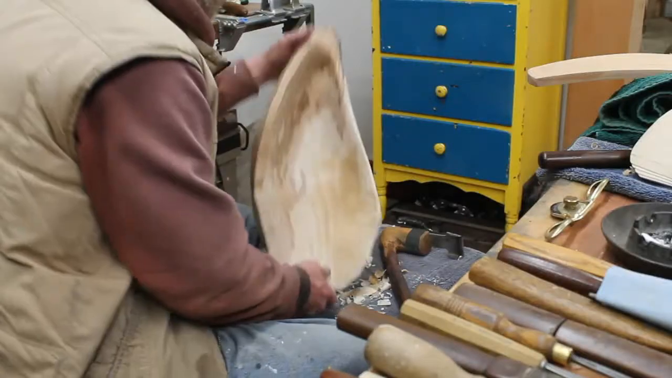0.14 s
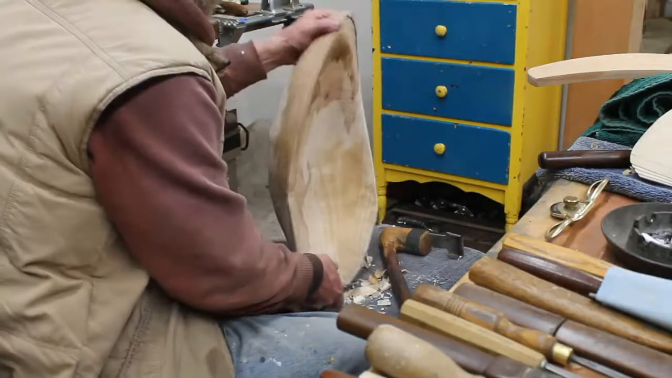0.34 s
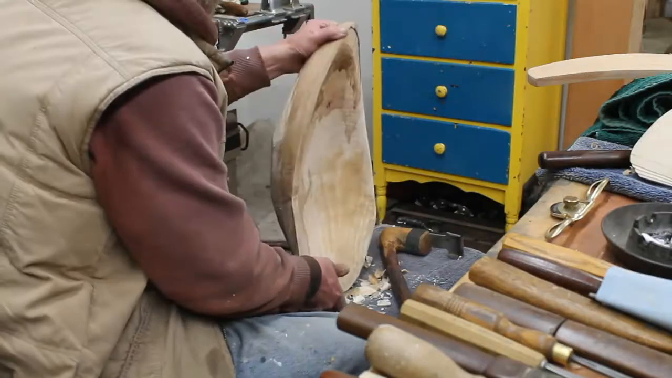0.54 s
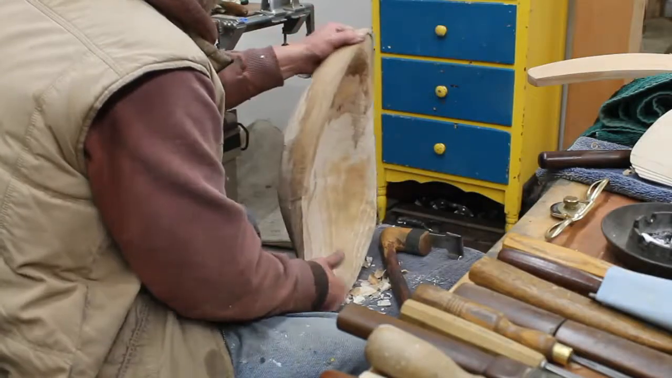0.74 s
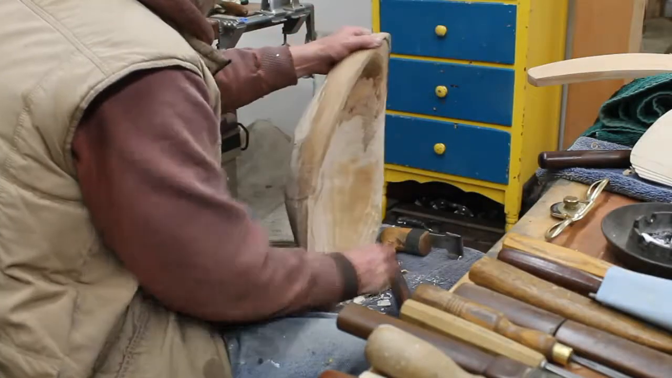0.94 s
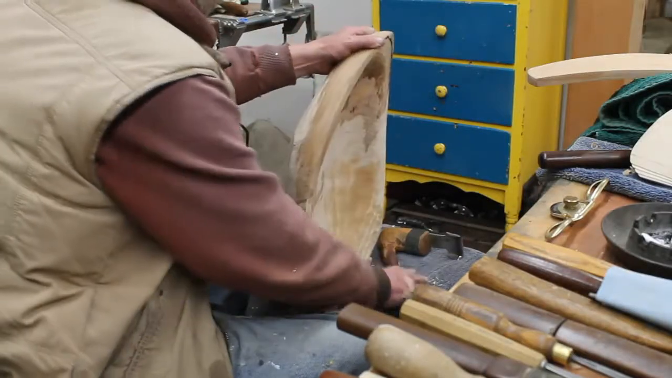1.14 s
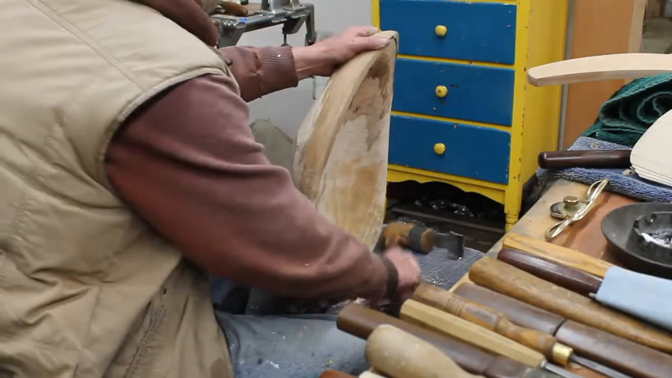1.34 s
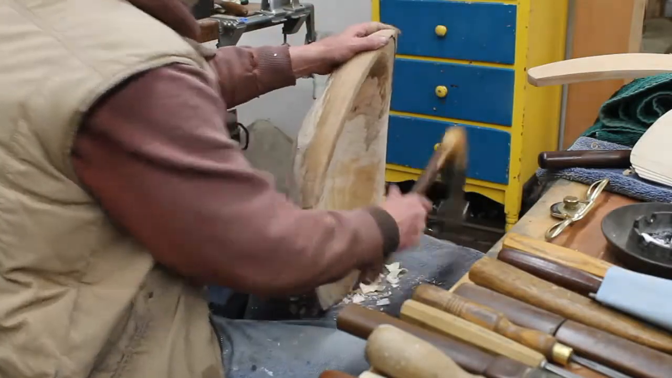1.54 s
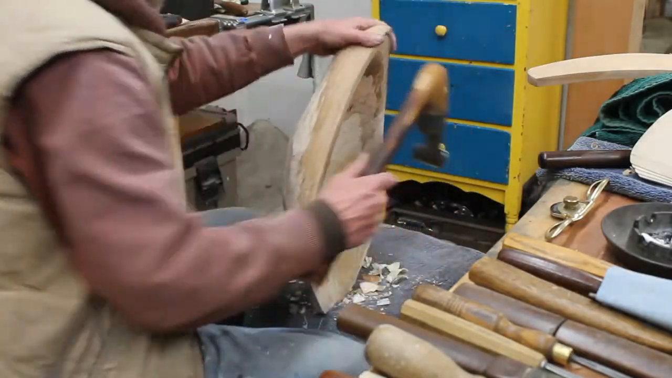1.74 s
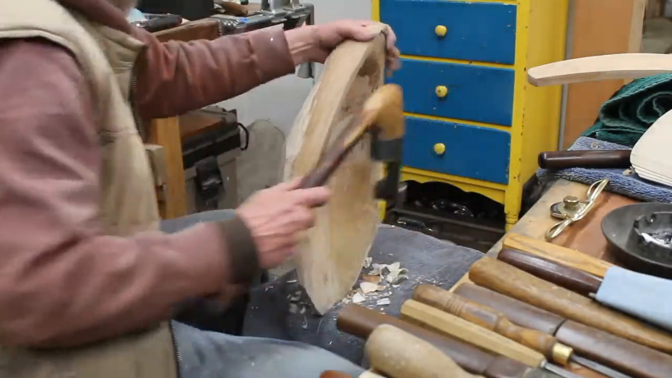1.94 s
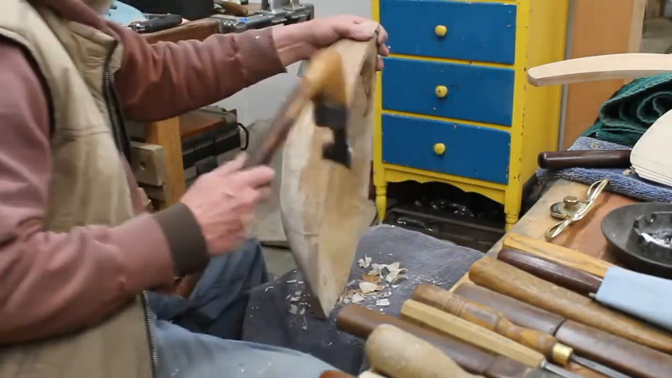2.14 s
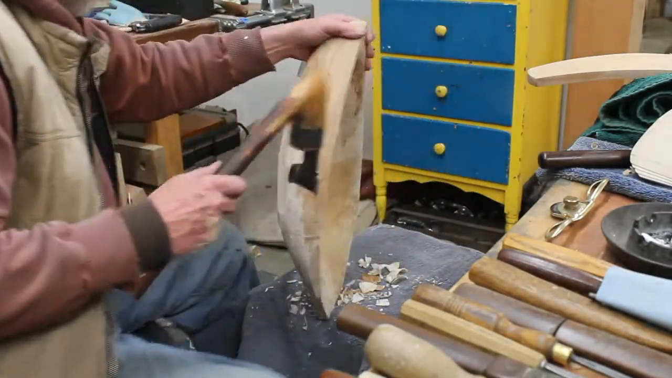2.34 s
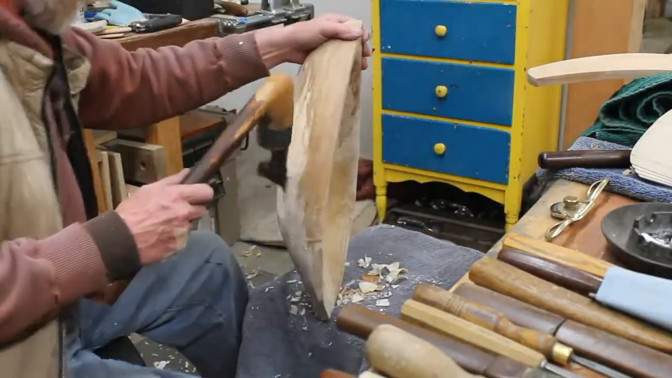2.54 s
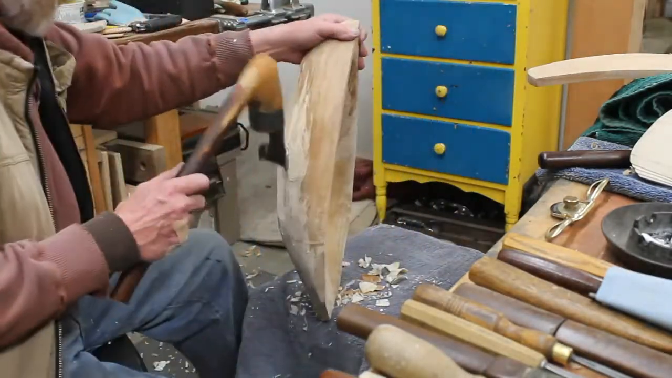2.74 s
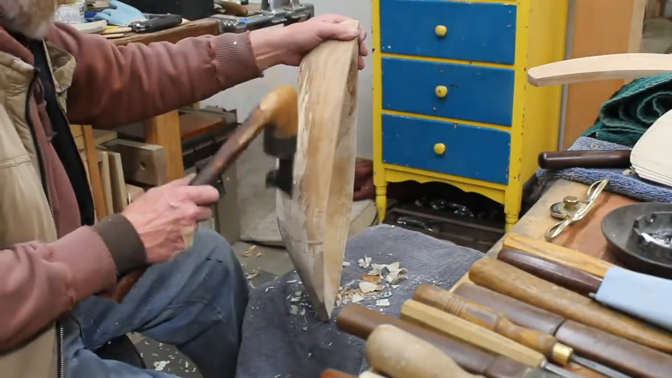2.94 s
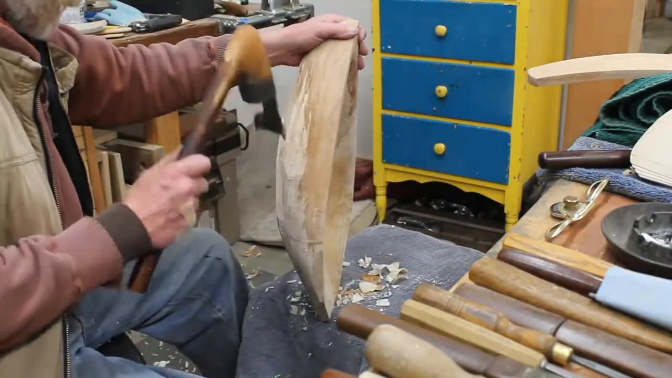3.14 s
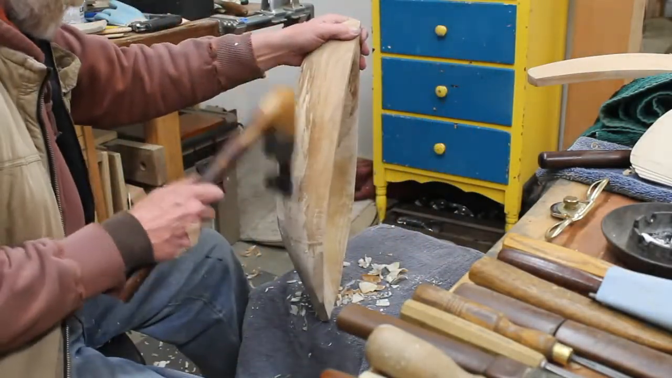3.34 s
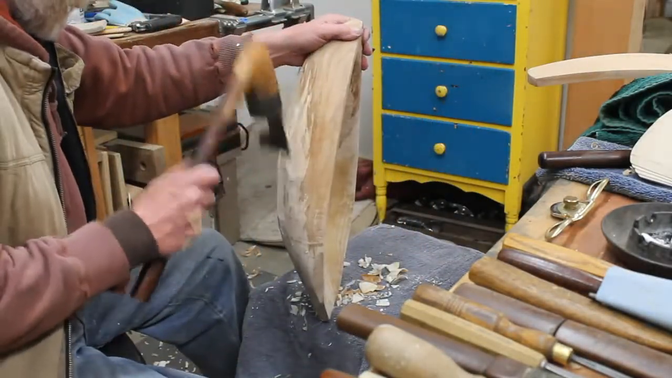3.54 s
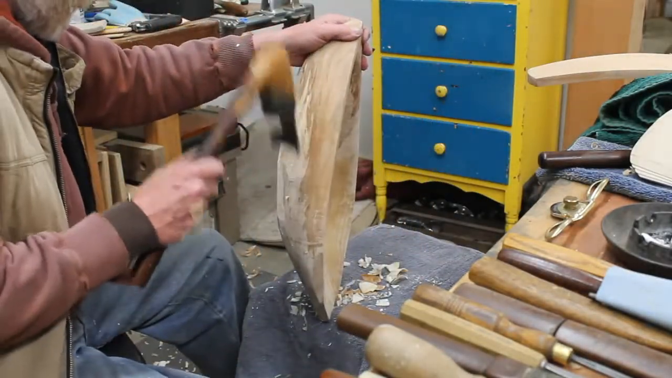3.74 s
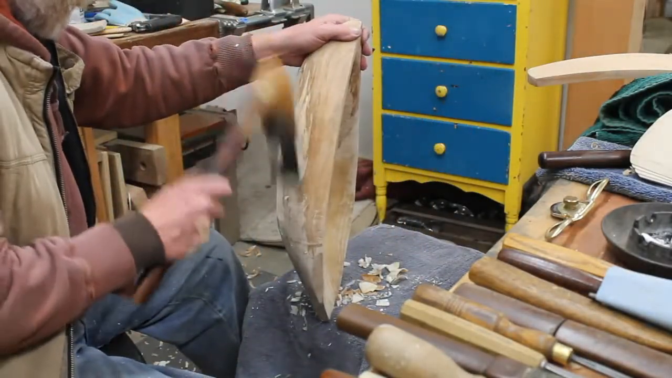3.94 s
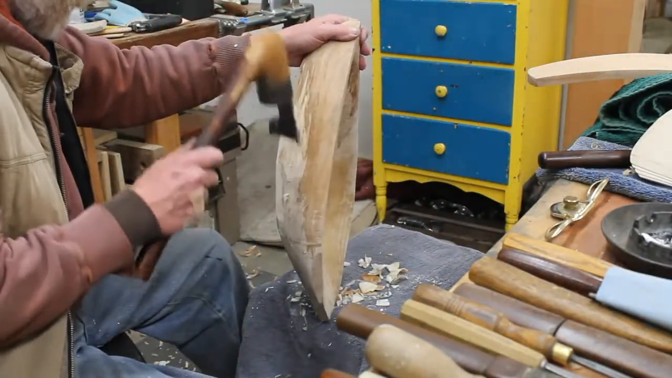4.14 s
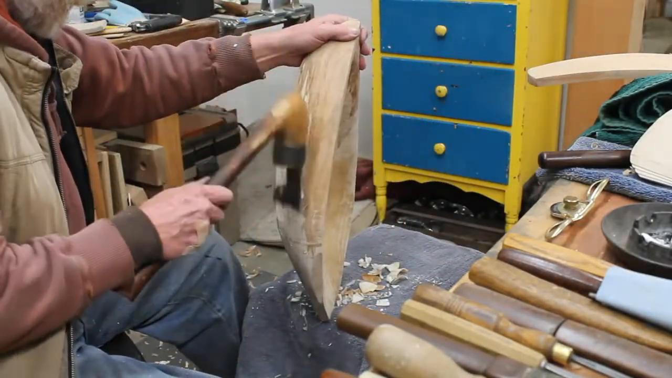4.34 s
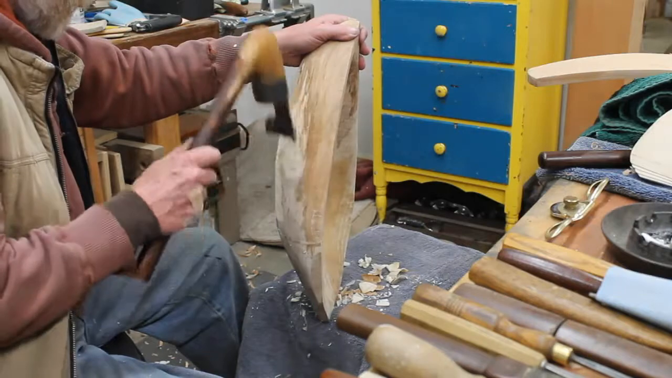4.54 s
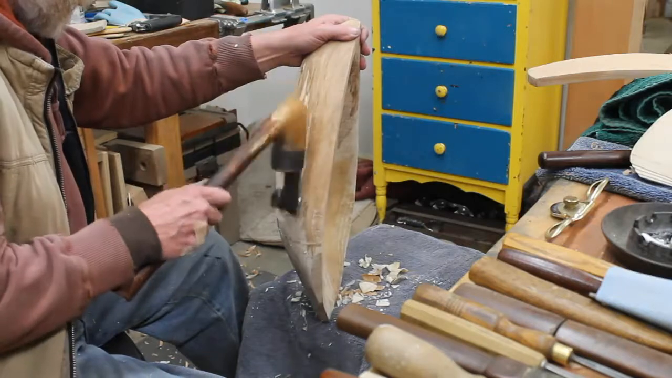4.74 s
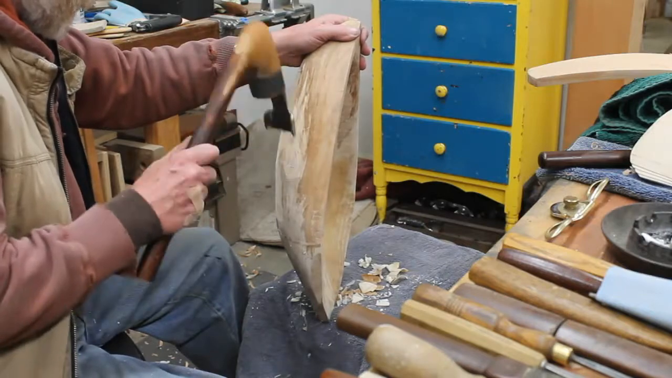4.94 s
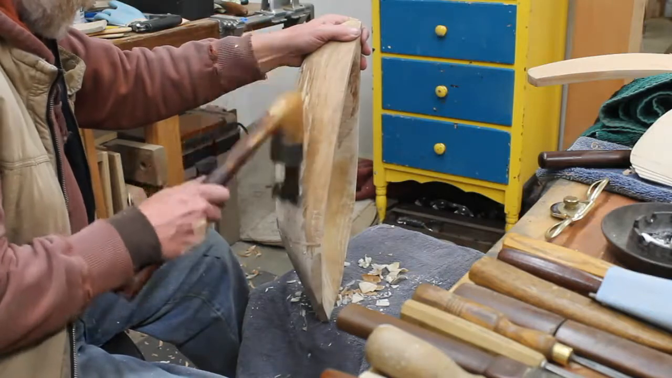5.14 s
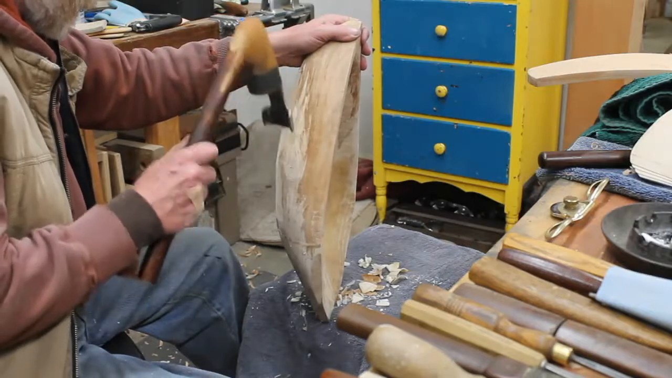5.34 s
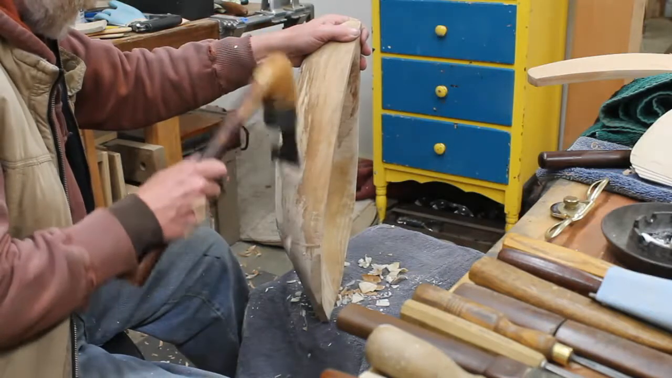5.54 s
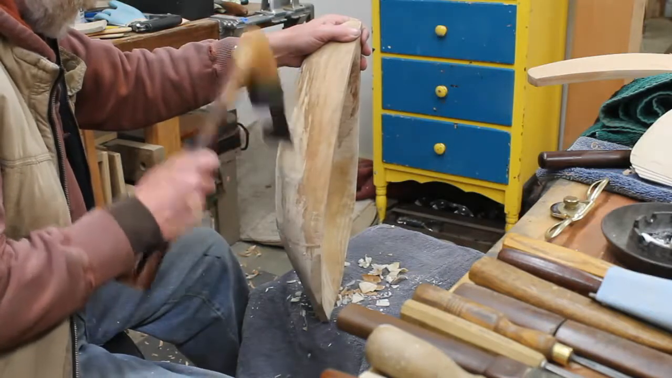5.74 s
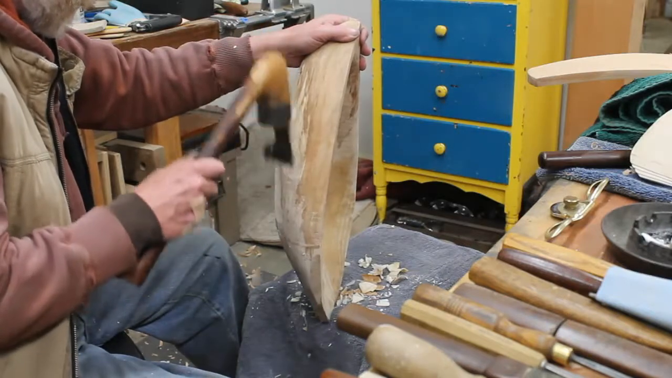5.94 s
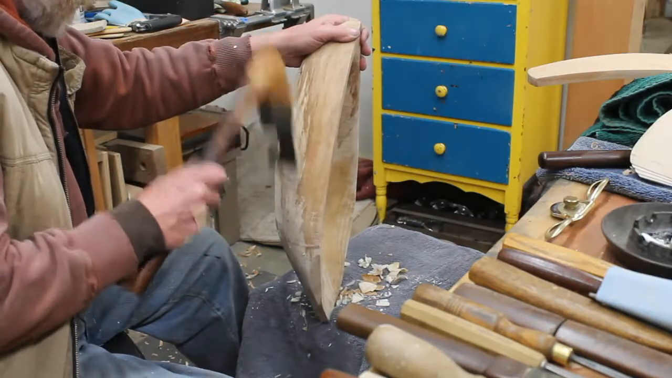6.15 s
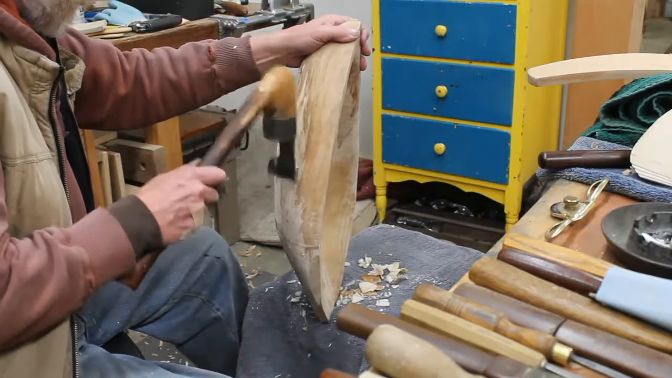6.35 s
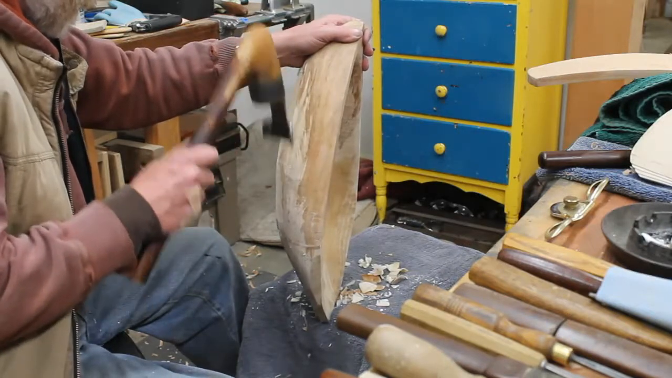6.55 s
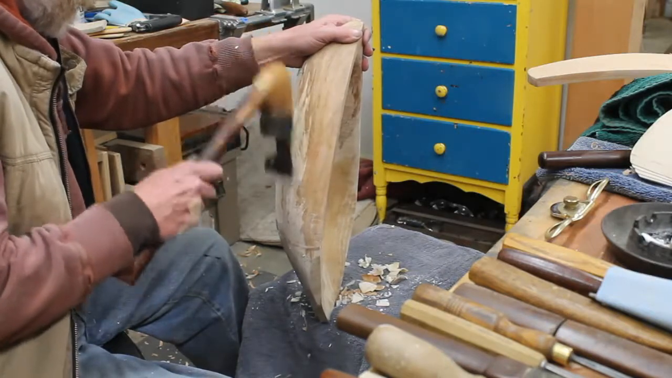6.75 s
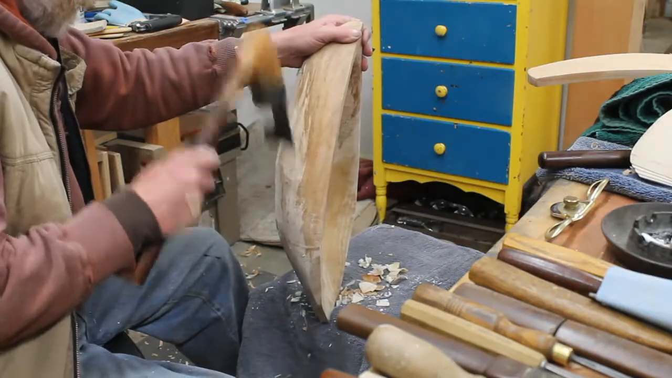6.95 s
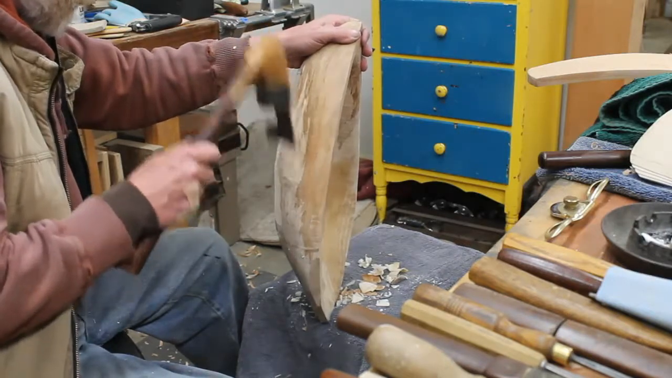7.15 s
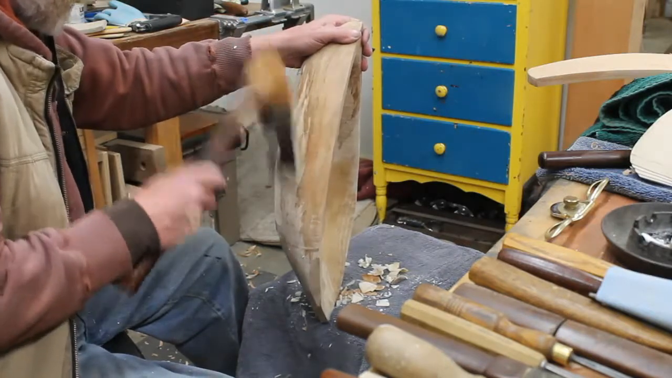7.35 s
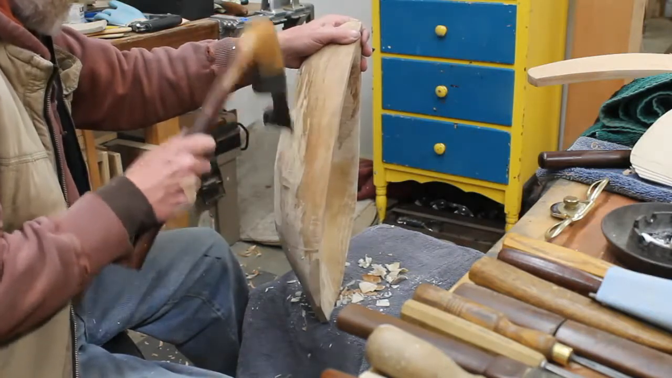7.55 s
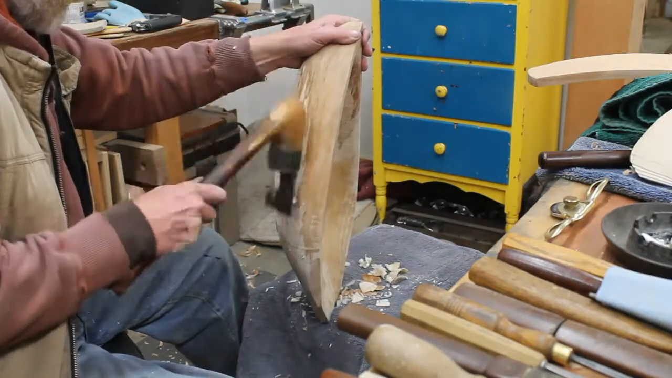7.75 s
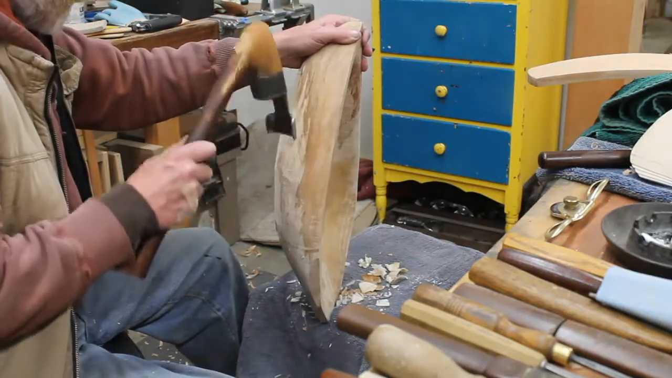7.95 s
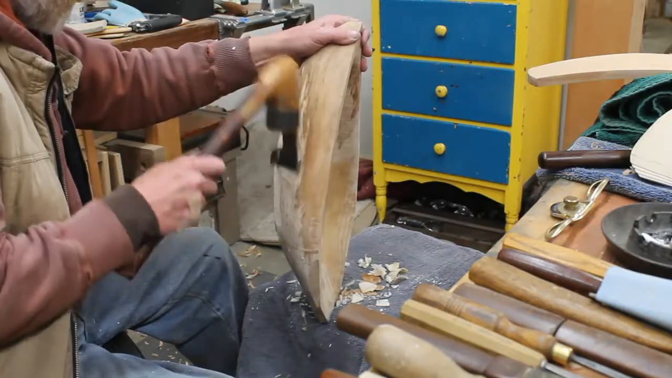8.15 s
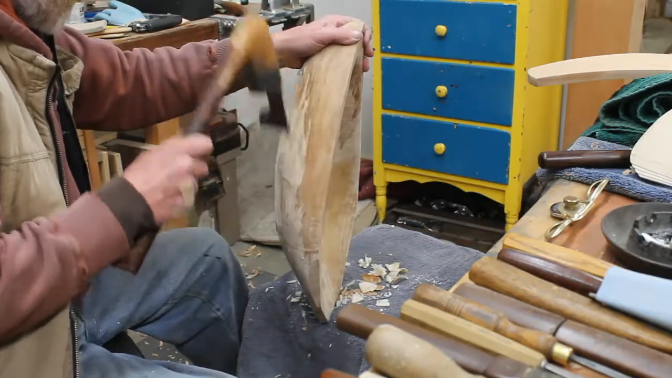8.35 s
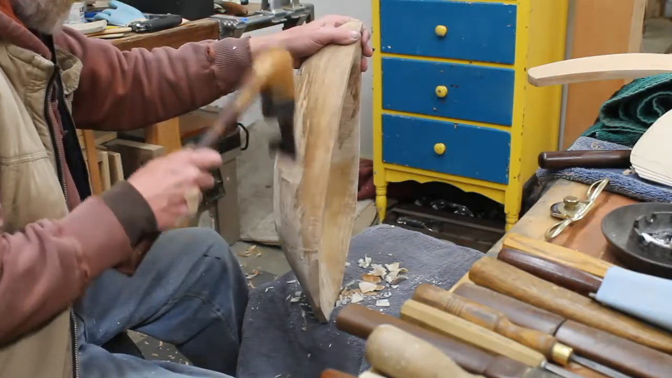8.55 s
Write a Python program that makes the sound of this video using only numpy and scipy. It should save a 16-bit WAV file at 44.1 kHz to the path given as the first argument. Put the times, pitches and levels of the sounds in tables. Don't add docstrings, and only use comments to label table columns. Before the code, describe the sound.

Jacket rustling and woody knocks as a bowl blank is shifted, then steady hatchet chops into green wood in a small workshop.

```python
import sys
import numpy as np
from scipy import signal
from scipy.fft import rfft, irfft
from scipy.io import wavfile
from scipy.ndimage import uniform_filter1d

SR = 44100
rng = np.random.default_rng(int(sys.argv[2]) if len(sys.argv) > 2 else 0)


def rack_gain(trim_db):
    fader = np.asarray(trim_db, float)
    return 10 ** (fader / 20)


def wav_record(signal):
    frames = np.transpose(np.atleast_2d(signal))
    bounded = np.clip(frames, -1, 1)
    quanta = np.round(bounded * 32767).astype(np.int16)
    wavfile.write(sys.argv[1], SR, quanta)


N = 379701

# [t/s, bite level/dB, bowl cavity level/dB, bowl wall level/dB, pitch of the struck spot f/Hz]
BLOWS = [(3.3451, -43, -35.5, -54, 1190), (3.674, -26.5, -34.5, -42, 1255), (4.023, -34, -47, -42, 1300),
         (4.029, -30, -35.5, -41.5, 1980), (4.366, -30.5, -37.5, -45, 1286),
         (4.7283, -34.5, -35.5, -51, 1390), (4.7523, -39, -37, -52.5, 1150), (5.108, -32, -34, -45.5, 1390),
         (5.476, -22, -28, -35, 1273), (5.8366, -23.5, -26, -29.5, 1340), (6.2052, -30, -30.5, -42, 1280),
         (6.2111, -18, -27.5, -28.5, 1240), (6.6556, -20, -27, -28.5, 1252), (7.0327, -28, -27, -31, 1346),
         (7.4084, -21, -32.5, -28, 1500), (7.7545, -25.5, -33, -45, 1280), (8.0817, -26, -46, -49, 1400),
         (8.086, -27, -25, -31, 1390), (8.4674, -23, -29, -36, 1360)]


def unit(x):
    return x / np.sqrt(np.mean(x ** 2))


def peak_one(x):
    return x / abs(x).max()


def band(x, lo_hz, hi_hz):
    limits = [lo_hz, min(hi_hz, 0.49 * SR)]
    return signal.sosfilt(signal.butter(2, limits, "band", fs=SR, output="sos"), x)


def colour(x, points):
    hz, db = np.transpose(points)
    f = np.arange(len(x) // 2 + 1) * SR / len(x) + 1
    return irfft(rfft(x) * rack_gain(np.interp(np.log(f), np.log(hz), db)), len(x))


def add(track, s, sound):
    i = int(s * SR)
    track[i:i + len(sound)] += sound[:N - i]


def burst(ms, rise_ms=0.21, shape=((20, 0), (20000, 0))):
    t_ms = np.arange(9600) * 1000 / SR
    noise = colour(rng.standard_normal(len(t_ms)), shape)
    return noise * (1 - np.exp(-t_ms / rise_ms)) * np.exp(-t_ms / max(ms, 0.2))


def walk(rate):
    k = int(SR / rate)
    steps = np.repeat(rng.standard_normal(N // k + 1), k)
    return unit(uniform_filter1d(steps, k)[:N])


def swells(s, db, swell_ms, fade_ms):
    coarse = np.arange(0, N, 64)
    late_ms = (coarse / SR - np.array(s)[:, None]) * 1000
    before_peak = -late_ms / np.reshape(swell_ms, (-1, 1))
    after_peak = late_ms / np.reshape(fade_ms, (-1, 1))
    fall_db = 10 * np.maximum(before_peak, after_peak)
    gain = np.sqrt((rack_gain(np.array(db)[:, None] - fall_db) ** 2).sum(axis=0))
    return np.interp(np.arange(N), coarse, gain)


def air():
    # [f/Hz, level/dB]
    air_tone = [(15, -57), (25, -26), (358, -4.5), (1280, -10), (1730, -10), (4130, -15), (15200, -23.5),
                (16500, -25)]
    hiss = unit(colour(rng.standard_normal(N), air_tone))
    return hiss * rack_gain(-62.5 + 1.3 * walk(2.832))


def rustle():
    # [peak t/s, scrape level/dB, cloth against wood level/dB, swell/ms, fade/ms]
    strokes = [(0.0, -58, 8, 100, 140), (.18, -54.5, 7.5, 190, 150), (.29, -57.5, -6, 160, 91),
               (.45, -51, -6.5, 90, 83), (.72, -54.5, 2.5, 75, 170), (.81, -53.5, -5, 47, 185),
               (1.08, -56.5, -2.5, 90, 330), (1.24, -61.5, 12, 180, 320), (1.36, -55.5, -1, 110, 88),
               (1.44, -61, -7.5, 85, 210), (1.55, -60, 2, 89, 130), (1.79, -50, 0.5, 107, 120),
               (1.87, -49, 0, 46, 170), (1.98, -49.5, -9.5, 100, 96), (2.15, -54, -10, 89, 82),
               (2.31, -48.5, -1, 80, 41), (2.46, -40.5, 4.5, 150, 340), (2.57, -45, 13.5, 65, 70),
               (2.639, -34, 10, 52, 62), (2.74, -45, -0.5, 130, 78), (3.109, -51, 2.5, 31, 88),
               (3.29, -61.5, -4, 80, 60)]
    # [peak t/s, level/dB, swell/ms, fade/ms]
    body_shifts = [
        (.3, -83, 330, 50),
        (.5, -80, 60, 340),
        (.93, -75, 100, 71),
        (1.35, -80, 250, 43),
        (1.52, -69, 72, 74),
        (1.75, -70.5, 46, 53),
        (2.0, -75.5, 150, 280),
        (2.5, -64.5, 30, 150),
        (3.23, -87, 120, 50),
    ]
    s, scrape_db, cloth_db, *shape_ms = np.transpose(strokes)
    rub_db = scrape_db - 5.5 - 0.65 * cloth_db
    nylon_db = scrape_db - 12 + 1.04 * cloth_db
    gains = [swells(s, scrape_db, *shape_ms),
             swells(s, rub_db, *shape_ms),
             swells(s, nylon_db, *shape_ms),
             swells(*np.transpose(body_shifts))]
    # [f/Hz, level/dB]
    tones = [[(600, -4), (1100, -0.5), (2500, -0.5), (4500, -3.5), (7000, -9.5), (10000, -15.5)],
             [(150, -14.0), (300, -9), (700, -7.5), (1100, -11.5), (1600, -11.5)],
             [(3500, -9), (6000, 1), (10000, -8.5), (15500, -11.0)],
             [(40, -20), (60, -1.5), (120, 8), (200, -17)]]
    grit_db = 2.5 * np.minimum(rng.exponential(size=N), 5)
    grains = rng.standard_normal((4, N)) * rack_gain(grit_db)
    out = np.zeros(N)
    for grain, tone, gain in zip(grains, tones, gains):
        flutter = rack_gain(1.3 * walk(70))
        out += unit(colour(grain, [(60, -113)] + tone + [(21000, -76)])) * gain * flutter
    return out


def sleeve():
    tone = [(20, -76), (500, 1.5), (1500, 5), (4000, 2.5), (9000, -13.5), (15500, -47), (21000, -60)]
    hiss = unit(colour(rng.standard_normal(N), tone))
    s, _, _, wall_db, _ = np.transpose(BLOWS)
    swing = swells(s - 0.01, -54 + 0.4 * wall_db, 50, 750)
    rest = rack_gain(-80)
    return hiss * (rest + swing) * rack_gain(1.4 * walk(12))


def taps():
    # [t/s, peak level/dB, colour f/Hz, length/ms]
    knocks = [(0.424, -45, 596, 2.8), (1.33, -51.5, 251, 4), (2.628, -30, 900, 8.3),
              (1.728, -40.5, 570, 14), (1.914, -34, 700, 2.9), (1.9615, -28.5, 783, 2.2),
              (2.123, -32, 660, 7.6), (2.258, -30, 710, 6.5), (2.3, -39, 730, 1.36), (4.672, -40, 564, 4.9),
              (6.166, -44, 560, 3)]
    # [t/s, peak level/dB, colour f/Hz, sharp edge relative level/dB]
    ticks = [(0.2488, -25.5, 2390, -9.5), (0.357, -37, 4640, -18), (1.8754, -33.5, 1990, 2.5),
             (1.9628, -32, 2800, -13), (1.9275, -32, 2050, -12), (2.1268, -24.5, 2050, -42),
             (2.2735, -29.5, 3180, 6.5), (2.439, -21, 3630, -1), (2.4602, -19, 2650, -20),
             (2.4722, -16.5, 4300, -7.5), (2.628, -24, 3500, -18), (2.645, -26, 4500, -28),
             (2.6981, -19.5, 3400, -20), (2.7107, -17.5, 4060, -33), (3.5496, -43.5, 1890, -4),
             (4.559, -45.5, 1670, -3), (6.491, -33.5, 3080, -16)]
    # [t/s, peak level/dB, colour f/Hz, length/ms, relative width 0-1]
    scratches = [(.248, -34.5, 4700, 1.6, 0.06), (.25, -37.5, 830, 4.5, 0.24),
                 (0.357, -38, 2200, 6.9, 0.76), (.435, -43.5, 750, 39, 0.17), (.815, -43.5, 1330, 27, 0.27),
                 (1.2, -60, 6260, 76, .03), (1.735, -41.5, 740, 120, 0.25), (1.75, -42.5, 2580, 89, 0.12),
                 (1.78, -55, 4670, 44, 0), (2.49, -33, 1440, 28, 0.15), (2.62, -26.5, 4040, 17, 0.12),
                 (3.566, -41.5, 1240, 12, 0.91), (4.674, -39.5, 1500, 14, 0.3),
                 (3.9018, -43.5, 2300, 2.5, 0.15), (4.68, -41, 2030, 14, 0.15),
                 (6.134, -37.5, 3220, 4.3, 0.23), (8.043, -44, 3500, 11, 0.7)]
    knock_width, knock_edge_db = 0.41, -12.5
    tick_ms, tick_width = 0.76, 0.32
    scratch_edge_db = -43
    hits = [(*row, knock_width, knock_edge_db) for row in knocks]
    hits += [(s, db, hz, tick_ms, tick_width, edge_db) for s, db, hz, edge_db in ticks]
    hits += [(*row, scratch_edge_db) for row in scratches]
    out = np.zeros(N)
    for s, db, hz, ms, width, edge_db in hits:
        hit = burst(ms, rise_ms=0.079 + 0.076 * ms)
        width = np.clip(width, 0.03, 0.8)
        wood = peak_one(band(hit, hz * (1 - width), hz * (1 + width)))
        edge = peak_one(band(hit, 2000, 10200))
        add(out, s, rack_gain(db) * (wood + rack_gain(edge_db) * edge))
    return out


def room(x):
    # [f/Hz, fade time/s]
    fade_times = [(100, 0.46), (350, 0.48), (1000, 0.53), (2500, 0.38), (6400, 0.35), (14000, 0.075)]
    wet_db, first_ms = -0.5, 0.44
    next_room_db, next_room_stretch = -26, 3.05
    hz, t60 = np.transpose(fade_times)
    t = np.arange(SR) / SR
    tail = np.zeros(len(t))
    for mid in 60 * 2 ** np.arange(0, 8.6, 0.5):
        noise = unit(band(rng.standard_normal(len(t)), mid / 2 ** 0.25, mid * 2 ** 0.25))
        fade_db = -60 * t / np.interp(np.log(mid), np.log(hz), t60)
        fade = rack_gain(fade_db) + rack_gain(next_room_db + fade_db / next_room_stretch)
        tail += np.sqrt(mid) * noise * fade
    tail *= 1 - np.exp(-(1000 * t / first_ms) ** 2)
    tail /= np.sqrt(np.sum(tail ** 2))
    return rack_gain(wet_db) * signal.fftconvolve(x, tail)[:N]


def thump():
    # [f/Hz, 60 dB fade time/s, build-up/s, signed share]
    floor_modes = [(62.6, 0.61, 0.034, 0.68), (55.3, 0.26, 0.028, -0.56), (103, 0.27, 0.008, 1),
                   (120.1, 0.25, 0.028, -1.98)]
    pair_db = (-8.5, -7.5)
    out, t = np.zeros(N), np.arange(SR) / SR
    for s, _, cavity_db, wall_db, _ in BLOWS:
        weight_db = 0.63 * wall_db + 0.65 * cavity_db
        for (hz, t60, rise, share), rel_db in zip(floor_modes, np.repeat(pair_db, 2)):
            swell = (1 - np.exp(-(t / rise) ** 2)) * rack_gain(weight_db + rel_db - 60 * t / t60)
            add(out, s - 0.003, share * swell * np.sin(2 * np.pi * hz * t))
    return out


def hatchet():
    # [f/Hz, level/dB]
    bite_tone = [(100, -50), (300, -38), (700, 4), (2100, -2.5), (2900, 3), (3800, -9), (6000, -8.5),
                 (12000, -39)]
    # [t/s, first mode f/Hz, first mode level/dB, upper modes level/dB]
    head_rings = [(3.344, 4390, -36.5, -64), (3.6741, 4640, -25.5, -42), (4.025, 4980, -26, -54),
                  (4.027, 4634, -25.5, -49), (4.366, 4730, -24, -48), (4.7292, 4560, -36, -59),
                  (4.753, 4350, -40.5, -54), (5.108, 4610, -27.5, -39), (5.4755, 4870, -20.5, -44),
                  (5.836, 4530, -27.5, -46), (6.2099, 5250, -16.5, -48), (6.657, 5300, -23, -50),
                  (7.033, 5080, -16.5, -41), (7.4097, 5340, -20.5, -40), (7.7547, 4970, -23, -43),
                  (8.085, 5000, -49, -45), (8.467, 4780, -20.5, -44)]
    # [f/Hz, level/dB, 60 dB fade time/s]
    upper_modes = [(8900, 2, .04), (6700, -10, .03), (12300, -10, .03)]
    bite_ms = 1.22
    free_hz, free_t60, grip_hz, split = 4350, 0.047, 650, 0.32
    out, t = np.zeros(N), np.arange(SR // 4) / SR
    for s, bite_db, *_ in BLOWS:
        crunch = peak_one(burst(bite_ms, shape=bite_tone))
        add(out, s, crunch * rack_gain(bite_db + 2.0))
    for s, hz, head_db, upper_db in head_rings:
        raised_hz = hz - free_hz
        t60 = free_t60 * np.exp(-raised_hz / grip_hz)
        pair = np.sin(2 * np.pi * hz * t) * np.cos(np.pi * split * raised_hz * t)
        ring = pair * rack_gain(head_db - 60 * t / t60)
        for upper_hz, rel_db, upper_t60 in upper_modes:
            ring += rack_gain(upper_db + rel_db - 60 * t / upper_t60) * np.sin(2 * np.pi * upper_hz * t)
        add(out, s, ring * (1 - np.exp(-t / 0.00092)))
    return out


def bowl():
    # [f/Hz, level/dB, 60 dB fade time/s]
    body_modes = [(159.6, -16.5, 0.15), (211, -14, 0.12), (281, -11.5, 0.13), (345, -4, 0.099),
                  (406.6, 2.5, 0.11), (463.7, 1, 0.084), (507, -9.5, 0.058), (518, -9, 0.13),
                  (656, -28.5, 0.21), (700, -25.5, 0.14), (774, -9.5, 0.085), (858, -4.5, 0.072),
                  (923, -3, 0.065), (1055, -4, 0.047)]
    # [f/Hz, level/dB, 60 dB fade time/s]
    wall_modes = [(1150, -21, 0.7), (1306, -16.5, 0.27), (1266.4, 4, 0.1), (1325, 6.5, 0.076),
                  (1455, 3, 0.041), (1500, -3.5, 0.2), (1563, -0.5, 0.058), (1943, 6.5, 0.033),
                  (2054, -10.5, 0.072), (2200, 1.5, 0.049), (2660, 5, 0.022)]
    spot_spread_db, pitch_spread = 2.0, 0.0074
    focus_peak_db, focus_octaves = 6.5, 0.087
    crush_db, crush_ms, crush_rise_ms = -4, 29, 15
    out, t = np.zeros(N), np.arange(SR // 4) / SR
    hz, db, t60 = np.transpose(body_modes + wall_modes)[:, :, None]
    hollow = (hz > 140) & (hz < 1100)
    onset = 1 - np.exp(-t * hz / 0.72)
    chance = rng.standard_normal((len(BLOWS), 3, len(hz), 1))
    for (s, _, cavity_db, wall_db, spot_hz), (spot, grip, phase) in zip(BLOWS, chance):
        focus_db = focus_peak_db * np.exp(-(np.log2(hz / spot_hz) / focus_octaves) ** 2)
        blow_db = np.where(hollow, cavity_db, wall_db + focus_db)
        size = rack_gain(db + blow_db + spot_spread_db * spot - 60 * t / t60)
        modes = size * np.sin(2 * np.pi * (hz * (1 + pitch_spread * grip) * t + phase))
        add(out, s, (modes * onset).sum(axis=0))
        crush = band(burst(crush_ms, rise_ms=crush_rise_ms), 199, 900)
        add(out, s, rack_gain(cavity_db + crush_db) * peak_one(crush))
    return band(out, 80, 17000) * rack_gain(-6)


def splits():
    # [t/s, peak level/dB, top octave
    # relative level/dB]
    tears = [(3.348, -38, -16), (3.674, -24, -14), (4.0234, -38, -3), (4.0269, -16.5, -15),
             (4.366, -20, -11), (4.389, -33, -2), (4.7269, -29.5, -7), (5.1099, -22, -12),
             (5.4761, -12, -6.5), (5.84, -11.5, -4.5), (6.2113, -35, -5), (6.6535, -18, -13),
             (7.0334, -20.5, -8.5), (7.4, -22.5, -25), (7.4094, -18.5, -14), (7.7522, -23.5, -3),
             (8.0484, -40, -3), (8.0825, -27.5, -14), (8.4666, -25.5, -16), (8.51, -44, 2),
             (8.519, -38, -3), (8.534, -39, 0)]
    out = np.zeros(N)
    for s, db, top_db in tears:
        tear = burst(1.5, rise_ms=0.53)
        body = peak_one(band(tear, 2600, 8300))
        top = peak_one(band(band(tear, 11300, 16600), 11000, 17000))
        add(out, s, rack_gain(db - 9.0) * body + rack_gain(db + top_db - 1.5) * top)
    return out


def scene():
    handling = taps()
    blows = hatchet() + bowl() + splits()
    wet = room(blows + rack_gain(-1.5) * handling)
    mono = air() + rustle() + sleeve() + handling + wet + thump() + blows
    return np.array([mono, mono])


def band_limit(x):
    return signal.sosfilt(signal.butter(12, 16970, fs=SR, output="sos"), x)


def record(dry):
    no_rumble = signal.sosfilt(signal.butter(2, 45, "high", fs=SR, output="sos"), dry)
    mix = signal.sosfilt(signal.ellip(8, 0.2, 70, 16300, fs=SR, output="sos"), no_rumble)
    return band_limit(mix)


dry = scene()
out = record(dry)
wav_record(out)
```